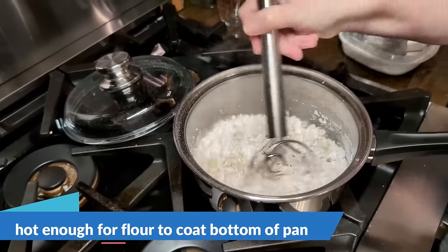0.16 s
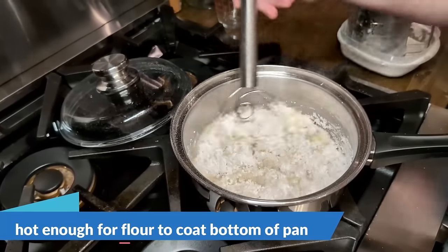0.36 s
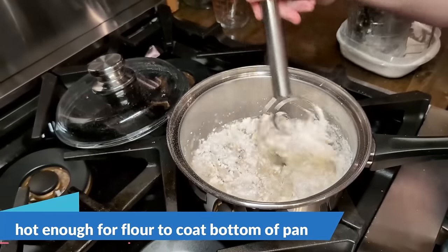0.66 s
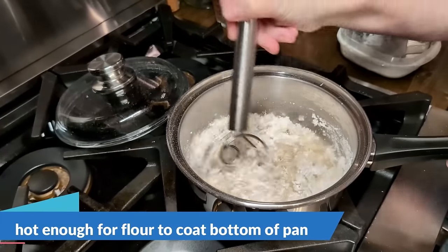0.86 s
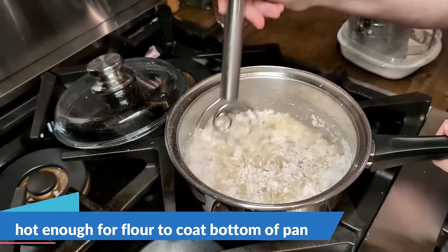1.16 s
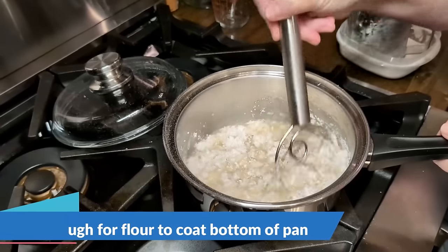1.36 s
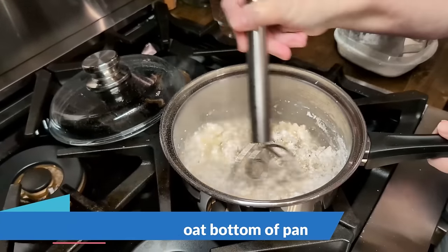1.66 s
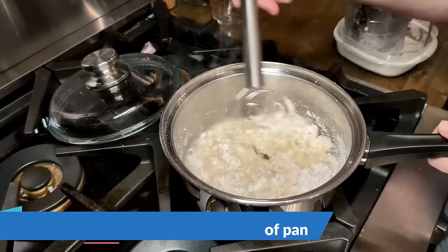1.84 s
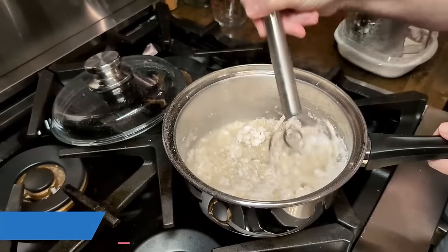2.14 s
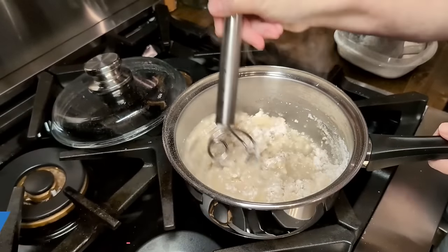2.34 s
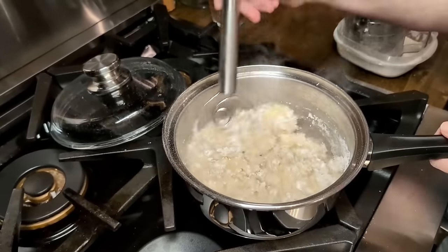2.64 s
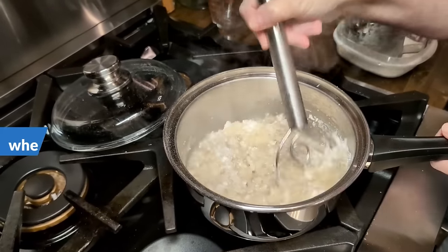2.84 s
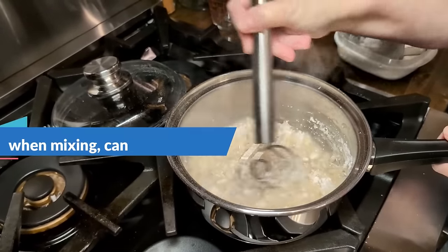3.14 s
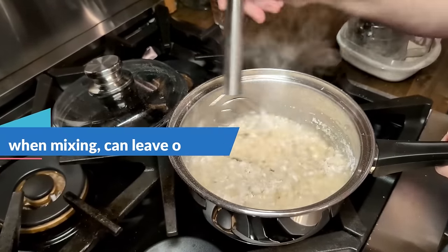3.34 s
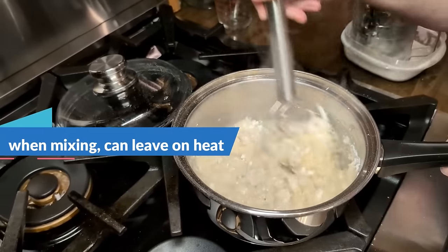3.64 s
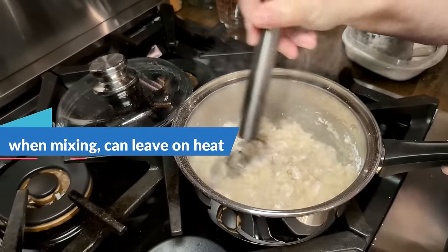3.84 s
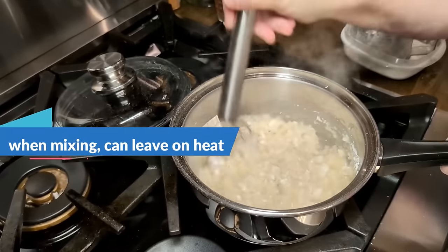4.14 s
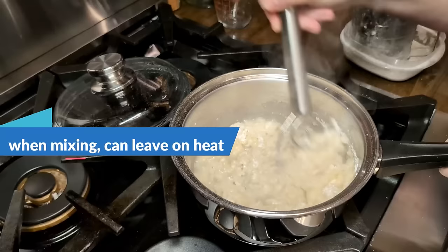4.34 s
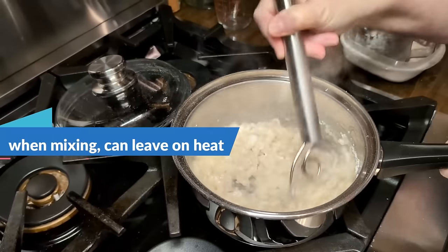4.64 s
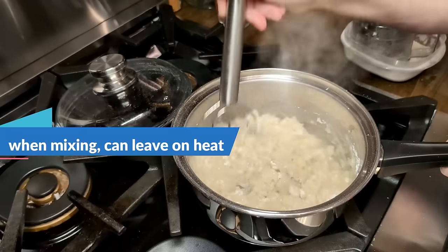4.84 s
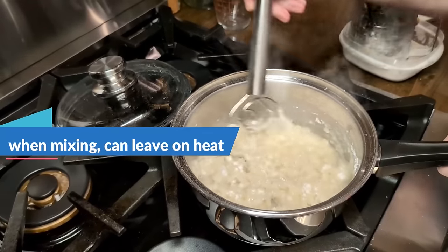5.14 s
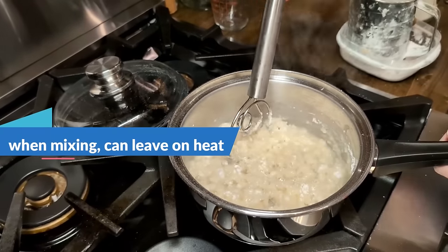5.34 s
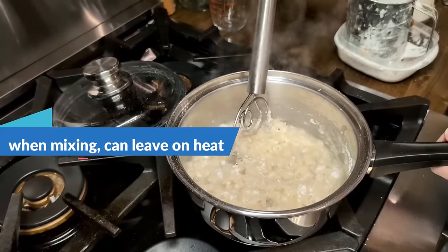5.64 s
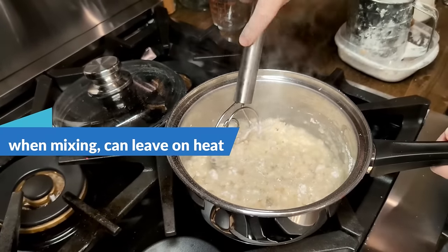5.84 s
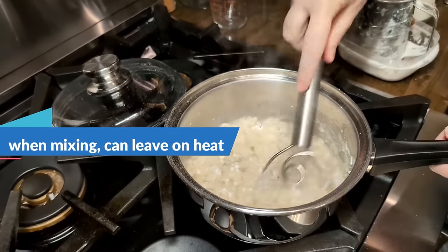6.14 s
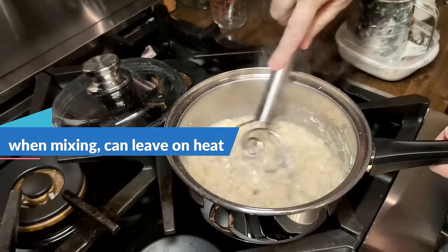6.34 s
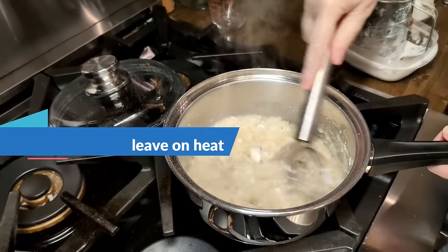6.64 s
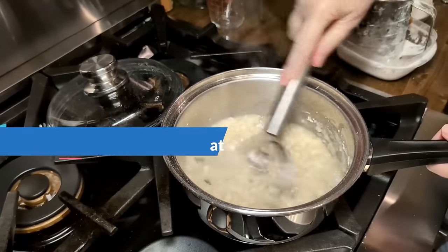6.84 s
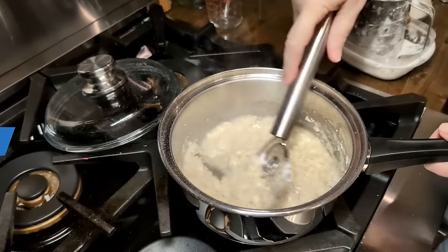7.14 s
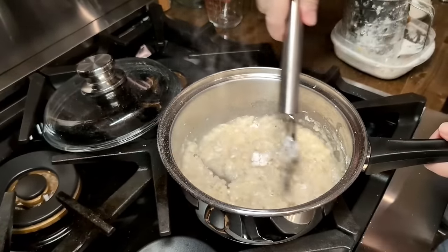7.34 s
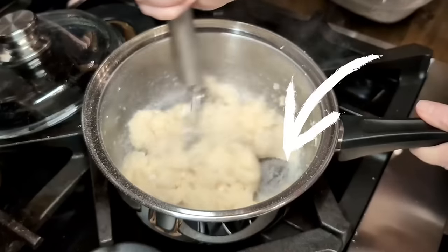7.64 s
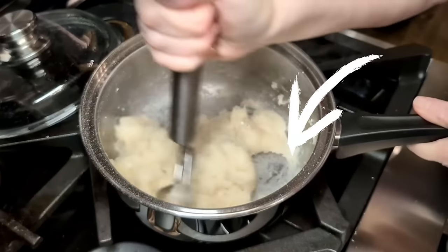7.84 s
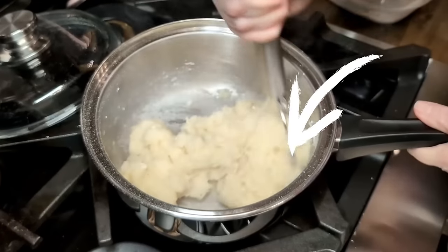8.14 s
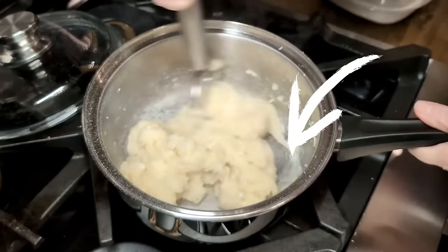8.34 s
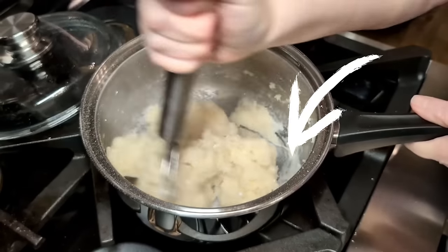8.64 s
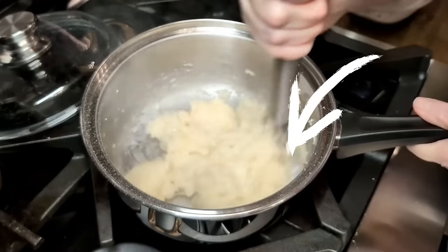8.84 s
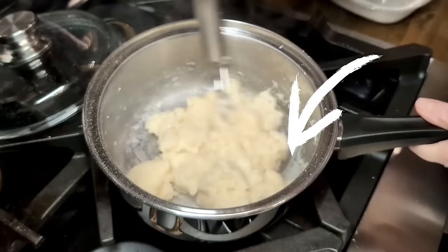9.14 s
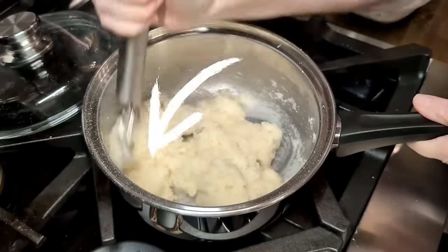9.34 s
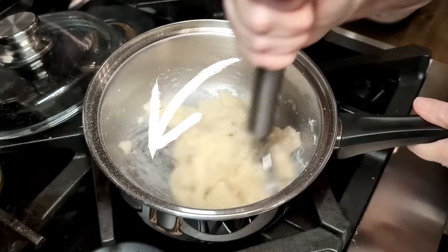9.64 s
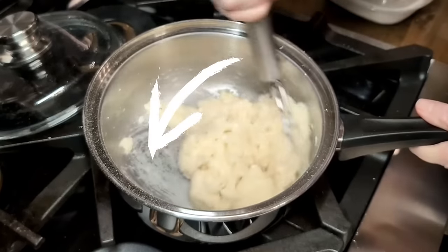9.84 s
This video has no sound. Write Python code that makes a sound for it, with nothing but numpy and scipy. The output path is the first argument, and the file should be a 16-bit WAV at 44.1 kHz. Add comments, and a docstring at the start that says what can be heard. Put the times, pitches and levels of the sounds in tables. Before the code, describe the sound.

A wire whisk circles quickly through thick paste in a steel saucepan, rasping and squelching, then knocks the pan four times and drags through stiff dough.

```python
"""Whisking thick paste in a saucepan

Kitchen stove, one microphone channel, the pan's direct sound standing above its room echo.
A wire whisk circles through flour paste in a steel saucepan: filtered friction noise rasps on the bottom,
noise bursts squelch and hollow notes open in the paste. Four knocks of bouncing wires ring the pan's modes.
Last come slow drags through stiff dough, ringing the pan bottom under a hiss, over low kitchen noise."""
import sys
import numpy as np
from scipy import signal
from scipy.fft import irfft
from scipy.io import wavfile
from scipy.ndimage import uniform_filter1d

SR = 44100
rng = np.random.default_rng(int(sys.argv[2]) if len(sys.argv) > 2 else 0)


def unload_audio(sound):
    """Save the sound as a 16-bit wav file, at the path given as the first command line argument."""
    columns = np.transpose(np.atleast_2d(sound))
    # keep every value between -1 and 1, then stretch to whole-number steps
    steps = np.round(np.clip(columns, -1, 1) * 32767)
    wavfile.write(sys.argv[1], SR, steps.astype(np.int16))


N = 440118
TIME, BINS = np.arange(N) / SR, np.fft.rfftfreq(8192, 1 / SR)  # samples [s], filter bins [Hz]
FRAMES, BANDS = np.arange(N // 128 + 2) * 128 / SR, np.fft.rfftfreq(512, 1 / SR)  # control frames [s], bands [Hz]

# All table levels are relative: each source sets its own trim.
# Rasp resonances at the two ends of the whisk's round, before they glide:
# (centre [Hz], width [Hz], level [dB])
HIGH_RASP = [(1450, 130, -11), (1797, 58, -12), (2630, 600, -19), (3470, 225, 1), (5160, 890, -20.5),
             (5660, 340, -8), (6940, 3400, -15), (8700, 230, -21), (9540, 1300, -19.5),
             (12260, 2600, -25.5)]
LOW_RASP = [(1315, 260, -20.5), (2552, 190, 0.5), (2830, 167, 1.5), (3500, 110, -6), (4870, 750, -7.5),
            (5490, 690, -14), (7140, 1170, -7.5), (8100, 320, -13.5), (10220, 2600, -21.5),
            (12630, 2600, -28)]
# Path of the whisk, circling and then only shifting about: (time [s], position [turns])
WHISK_TURNS = [(0, -0.12), (0.28, 0.45), (1.98, 5), (4.87, 13), (5.08, 13.5), (5.2, 13.74), (5.28, 13.65),
               (6.15, 13.87), (7.7, 14)]
# Wires bearing down on the pan: (peak time [s], level [dB], rise [s], fall [s], treble share [dB])
SCRAPES = [ (0.048, -46.5, 0.02, 0.038, -10.5), (0.15, -57, 0.051, 0.077, -16),
           (0.225, -58.5, 0.029, 0.084, -5), (0.42, -49, 0.031, 0.04, -9), (0.65, -56, 0.086, 0.095, -5.5),
           (0.875, -50.5, 0.075, 0.037, -11.5), (1.07, -59, 0.052, 0.019, -8),
           (1.415, -47.5, 0.051, .04, -8.5), (1.587, -56.5, 0.015, 0.021, -9),
           (1.745, -50.5, 0.031, 0.05, -3.5), (1.808, -49.5, 0.0097, 0.025, -8.5),
           (1.995, -41, 0.03, 0.018, -11), (2.085, -55.5, 0.023, 0.023, -10),
           (2.172, -48, 0.039, 0.022, -3.5), (2.27, -55.5, 0.046, 0.036, -5),
           (2.322, -49.5, 0.0073, .05, -7), (2.415, -52.5, .018, 0.05, -7.5), (2.474, -58, .012, 0.025, 2),
           (2.554, -53.5, 0.025, 0.041, -4.5), (2.68, -49, 0.032, 0.038, -7),
           (2.85, -55.5, 0.023, 0.034, 0), (2.924, -48, 0.045, 0.02, -4.5), (3.08, -54, 0.13, 0.02, -11),
           (3.186, -49, 0.0054, 0.015, -21), (3.295, -50, 0.0068, 0.021, -13),
           (3.394, -47.5, 0.015, 0.023, -10.5), (3.453, -37.5, 0.02, 0.027, -7.5),
           (3.57, -53, 0.048, 0.035, -7), (3.648, -42.5, 0.033, 0.02, -4), (3.77, -56, 0.023, 0.06, -12),
           (3.835, -47, 0.019, 0.014, -6), (3.98, -55.5, 0.036, 0.033, -6.5),
           (4.038, -45, 0.0059, 0.03, -6), (4.16, -51.5, .025, .025, -10), (4.222, -48.5, 0.032, .028, -6),
           (4.289, -49.5, .014, 0.02, 0), (4.355, -40.5, 0.021, 0.023, -5.5), (4.445, -51, 0.012, .02, -9),
           (4.53, -53.5, 0.026, 0.047, -13), (4.744, -41.5, .045, 0.012, -4),
           (4.808, -50.5, 0.016, 0.018, -3.5), (4.909, -43.5, 0.038, 0.013, -8.5),
           (5.02, -55.5, 0.039, 0.045, -0.5), (5.087, -41, 0.033, 0.009, -3.5),
           (5.165, -45.5, 0.0065, .025, -5.5), (5.209, -40, 0.019, .025, -5.5),
           (5.265, -44, 0.023, 0.019, -9), (6.185, -47.5, 0.025, 0.05, -9.5),
           (6.27, -49.5, 0.071, 0.028, -8), (7.72, -61.5, 0.08, 0.054, -7),
           (7.809, -38.5, 0.042, 0.035, -5.5)]
# Wires lifting off the bottom: (time [s])
LIFTS = [0.33, 1.28, 1.555, 1.925, 3.255, 4.015]
# Slow strokes through stiff dough:
# (peak time [s], pressure on the pan [dB], hiss of the wires [dB], rise [s], fall [s])
DRAGS = [ (7.432, -63, -57.5, 0.009, 0.039), (7.985, -40.5, -45, 0.011, 0.044),
         (8.025, -31.5, -38, 0.027, 0.031), (8.165, -67, -52.5, 0.13, 0.027),
         (8.321, -70.5, -76, 0.084, 0.047), (8.45, -67, -67, 0.079, 0.065),
         (8.556, -75.5, -53.5, 0.048, 0.024), (8.687, -45.5, -51.5, 0.017, 0.018),
         (8.722, -36, -43.5, 0.023, 0.031), (8.87, -59, -52, 0.052, .022), (8.97, -69, -51, 0.053, 0.1),
         (9.1, -45.5, -40.5, 0.048, 0.023), (9.21, -50, -75, 0.051, 0.12), (9.28, -54.5, -49, 0.047, 0.12),
         (9.43, -77, -45, 0.045, 0.13), (9.551, -34, -40.5, 0.04, 0.044), (9.875, -56, -56.5, 0.052, 0.032)]
# Pan bottom under the wires: (centre [Hz], width [Hz], level [dB])
PAN_BOTTOM = [(451, 47, -26), (936, 180, -18), (1433, 110, -12), (1938, 86, 0.5), (2300, 130, -11),
              (2520, 230, -12), (2730, 55, 1.5), (2830, 230, -9), (3072, 76, -9), (3512, 2100, -20)]
# Hiss of the dragged wires: (frequency [Hz], level [dB])
WIRE_HISS = [(1500, -20), (3300, -10), (4400, -9.5), (5300, -4.5), (6200, 1), (7000, -2.5), (7600, -8),
             (8400, 1.5), (9800, -5.5), (10900, -7.5), (12000, -10.5), (15500, -19.5)]
# Dough smeared up the wall, sinking in pitch: (time [s], level [dB], centre [Hz])
SMEAR = [(9.183, -57, 2500), (9.2, -43, 2380), (9.24, -49.5, 2020), (9.285, -56.5, 1620), (9.36, -76, 1520)]
# Dough rubbed along the bottom: (time [s], level [dB])
RUB = [(9.6, -86), (9.69, -58.5), (9.75, -53.5), (9.83, -63), (9.93, -69)]
# Resonances of that rub: (centre [Hz], width [Hz], level [dB])
RUB_RESONANCES = [(430, 150, -0.5), (670, 130, -2), (1075, 300, -18.5)]
# Whisk knocked on the pan: (time [s], clatter [dB], clang [dB], chatter [s], ring [dB])
KNOCKS = [(6.7777, -26.5, -22, 0.012, -29.5), (6.893, -28, -41.5, 0.0013, -38),
          (7.001, -15.5, -14.5, 0.0043, -24.5), (7.1317, -24, -58, 0.0045, -55)]
# Dense, quickly dying clatter of wires and pan: (frequency [Hz], level [dB])
CLATTER = [(80, -26), (180, -8), (300, -9), (420, -2.5), (520, 0), (750, 2), (1250, 2), (1650, -3.5),
           (2500, 7.5), (3500, -5.5), (4050, -1), (5400, -4.5), (8500, -6.5), (10500, -13.5),
           (15500, -25.5)]
# Clang of the pan wall: (centre [Hz], width [Hz], level [dB])
WALL_CLANG = [(2280, 25, -10), (2479, 56, 1), (2750, 210, -1), (2870, 17, -7), (3014, 180, 2.5),
              (3320, 60, -8), (3630, 640, -9), (3760, 67, -18)]
# Lasting pan modes: (frequency [Hz], level [dB], t60 [s])
PAN_MODES = [(461, -14, .26), (622, -12, .3), (764, -16, .3), (975, -13, .2), (1252, -10, .2),
             (1822, -9, .18), (2207, -1, .2), (2441, 0, .36), (2459, -6, .45), (2812, 1, .18),
             (3015, -2, .18), (3709, -20, .45), (3840, -5, .14), (4430, -16, .18), (7545, -19, .18),
             (8530, -18, .16)]
# Wires ticking lightly on the pan: (time [s], level [dB], treble share [dB], chatter [s])
TICKS = [(0.033, -61, 0, 0.011), (1.384, -57, -2, 0.0038), (1.572, -56.5, -16, 0.0081),
         (1.793, -52, 0, 0.0065), (1.947, -53.5, -8, 0.0097), (2.46, -52.5, -1.5, 0.011),
         (2.728, -52.5, -1, 0.0079), (3.18, -50.5, -14, 0.0016), (3.381, -70, -15, 0.0082),
         (3.484, -42, -10, 0.02), (4.227, -46.5, -25, 0.0064), (6.071, -50.5, -6.5, 0.026),
         (6.473, -57.5, -1.5, 0.0077), (6.676, -52.5, -5, 0.017)]
# Wires skidding lightly over bare steel: (peak time [s], level [dB], half length [s])
SKIDS = [(5.555, -76, .018), (5.675, -77, .004), (5.79, -79, .018), (5.87, -79, .025), (5.97, -78, .008),
         (6.005, -78, .007), (6.478, -55, .007), (6.733, -47.5, .009), (6.967, -39, .016),
         (7.203, -42, .022)]
# Resonances of those skids: (centre [Hz], width [Hz], level [dB])
BARE_STEEL = [(2630, 750, 0), (4530, 570, 0.5), (5600, 330, -0.5), (7000, 590, -3.5), (8400, 330, -4.5),
              (11500, 7300, -17.5)]
# Paste giving way: (time [s], level [dB], length [s])
SQUELCHES = [(0.484, -57.5, 0.091), (0.843, -51.5, 0.037), (1.581, -51.5, 0.061), (1.791, -55.5, 0.043),
             (2.355, -49, 0.046), (2.728, -51, 0.035), (3.019, -51, 0.057), (3.087, -46.5, 0.063),
             (3.484, -35.5, 0.027), (3.629, -53, 0.055), (3.844, -44, 0.034), (4.135, -51, 0.057),
             (4.226, -41, 0.061), (4.38, -57.5, 0.3), (4.744, -50.5, 0.12), (4.851, -52.5, 0.088),
             (4.916, -47.5, 0.065), (5.147, -41, 0.095), (5.192, -38.5, 0.029), (6.216, -54, 0.11),
             (7.995, -56, 0.27), (8.719, -60, 0.45)]
# Spectrum of the squelches: (frequency [Hz], level [dB])
PASTE_SPECTRUM = [(60, -17.5), (200, -10), (300, -4.5), (420, -1.5), (680, 0.5), (1000, -9), (1400, -14.5),
                  (2200, -8.5), (5000, -29)]
# Air pockets opening in the paste: (time [s], level [dB], centre [Hz])
AIR_POCKETS = [(1.511, -52, 1350), (3.354, -52, 1290), (3.7, -47, 1300), (4.0728, -44, 1284),
               (4.412, -42.5, 1300), (4.7696, -39, 1315), (5.1549, -31, 1390), (7.342, -46, 820)]
# Spectrum of the kitchen background: (frequency [Hz], level per Hz [dB])
KITCHEN_NOISE = [(26, -41.5), (45, -3), (184, -10), (285, -6), (322, -13), (524, -12), (852, -20.5),
                 (939, -23.5), (1090, -26), (2200, -31), (2370, -22.5), (3240, -33.5), (15000, -47.5)]
# Decay of the room: (frequency [Hz], t60 [s])
ROOM_DECAY = [(150, 0.84), (700, 0.55), (2500, 0.33), (6000, 0.3), (14000, 0.14)]

# The main rasp resonance is highest at each whole turn; its dip half way round deepens as the paste thickens
TOP_HZ, DIP_HZ, DIP_HZ_PER_S, DEEPEST_DIP_HZ = 3482, 330, 340, 870
# Light rubbing while the whisk circles, a little louder and duller at the top of each turn
RUBBING_DB, RUBBING_SWING_DB = -64.5, 2
RUBBING_TREBLE_DB, TREBLE_SWING_DB = -6.5, 3
CIRCLING_END_S, CIRCLING_FADE_S, LIFT_S = 5.1, 0.015, 0.021
# Exponents of a stroke's (rise, fall): 1 a sharp peak, 2 a round bell
SCRAPE_SHAPE, DRAG_SHAPE = (1.4, 1.8), (1.5, 1.06)
BACKGROUND_DB, EDGE_HZ = -69, 15900


def stirring():
    """Friction whose resonances glide and hand over from one set to the other as the whisk goes round."""
    level_db, hz, treble_db = whisk_motion()
    place = np.clip((hz - 2780) / 600, 0, 1)
    high = shifted(HIGH_RASP, (hz / 3470) ** 0.26)
    low = shifted(LOW_RASP, (hz / 2660) ** 0.4)
    gain = np.hypot(place * high, (1 - place) * low)
    gain = np.hypot(gain, amp(-17.5) * shifted(PAN_BOTTOM, 0.94))  # the pan bottom answers faintly
    # tilt the colour towards the treble share of the moment
    treble_power = (gain[BANDS > 6500] ** 2).sum(0)
    share_db = 10 * np.log10(treble_power / (gain ** 2).sum(0))
    tilt = read([(3200, 0.13), (5500, 1.3), (7500, 2.3), (12000, 3.23)], BANDS)[:, None]
    gain = gain * amp(tilt * np.clip(treble_db - share_db - 0.7, -9, 9))
    return amp(level_db - 2.0) * rasp(gain, patch_db=4.5, grain_db=1.0, judder_db=2.5)


def whisk_motion():
    """Level, main resonance and treble share of the rasp: rubbing that follows the turn, plus scrapes."""
    top = np.cos(2 * np.pi * np.interp(FRAMES, *np.transpose(WHISK_TURNS)))  # 1 at each whole turn
    dip = np.minimum(DIP_HZ + DIP_HZ_PER_S * FRAMES, DEEPEST_DIP_HZ)
    hz = TOP_HZ - dip * (1 - top) / 2
    contact = (1 - np.tanh((FRAMES - CIRCLING_END_S) / CIRCLING_FADE_S)) / 2
    for s in LIFTS:
        contact = contact * (1 - np.exp(-((FRAMES - s) / LIFT_S) ** 2))
    power = (contact * amp(RUBBING_DB + RUBBING_SWING_DB * top)) ** 2 + 1e-12
    treble = power * amp(RUBBING_TREBLE_DB - TREBLE_SWING_DB * top) ** 2
    for s, db, rise, fall, treble_db in SCRAPES:
        scrape = (amp(db) * stroke(s, rise, fall, SCRAPE_SHAPE)) ** 2
        power = power + scrape
        treble = treble + scrape * amp(treble_db) ** 2
    level_db = np.interp(TIME, FRAMES, 10 * np.log10(power))
    return level_db, hz, 10 * np.log10(treble / power)


def dragging():
    """Wires pressed through stiff dough make the bared pan bottom sing under their hiss."""
    press_db, hiss_db = drag_levels()
    smear_db, smear_hz = gesture(SMEAR)
    rub_db, = gesture(RUB)
    grit = rasp(steady(np.ones(len(BANDS))), patch_db=5.5, grain_db=1.5, judder_db=-3.3)
    bottom = amp(press_db + 1.5) * colour(grit, humps(PAN_BOTTOM))
    hiss_gain = steady(amp(read(WIRE_HISS, BANDS)))
    hiss = amp(hiss_db - 2.0) * rasp(hiss_gain, patch_db=3.0, grain_db=-3.0, judder_db=2.5)
    sinking = shifted([(2000, 420, 0)], np.interp(FRAMES, TIME, smear_hz) / 2000)
    smear = amp(smear_db) * rasp(sinking, patch_db=3.5, grain_db=1.5, judder_db=1.2)
    rub = amp(rub_db) * colour(rng.standard_normal(N), humps(RUB_RESONANCES))
    return bottom + hiss + smear + rub


def drag_levels():
    """Each slow stroke presses on the pan and makes the wires hiss, in its own proportion: levels in dB."""
    press = hiss = 1e-12
    for s, press_db, hiss_db, rise, fall in DRAGS:
        swell = stroke(s, rise, fall, DRAG_SHAPE)
        press = press + (amp(press_db) * swell) ** 2
        hiss = hiss + (amp(hiss_db) * swell) ** 2
    return [np.interp(TIME, FRAMES, 10 * np.log10(power)) for power in (press, hiss)]


def knocks():
    """Hard blows: a wide clatter, the clang of the wall, and a few modes that ring on."""
    t, out = np.arange(SR) / SR, np.zeros(N)
    for s, clatter_db, clang_db, chatter, ring_db in KNOCKS:
        add(out, s, amp(clatter_db) * strike(chatter, t60=0.07, gain=amp(read(CLATTER, BINS))))
        add(out, s, amp(clang_db) * strike(chatter, t60=0.014, gain=humps(WALL_CLANG)))
        for hz, db, t60 in PAN_MODES:
            # whisk and dough keep touching the pan, which makes each mode's ring uneven
            unevenness = .75 * wander(hz=55.6, count=len(t))
            tone = np.sin(2 * np.pi * (hz * t + rng.random()) + unevenness)
            onset = 1 - np.exp(-t / .001)
            add(out, s, amp(ring_db + db - 60 * t / t60) * tone * onset)
    return out


def ticks():
    """Light touches sound wires, bottom and wall together; skids are friction through steel resonances."""
    out = np.zeros(N)
    wires = humps(HIGH_RASP) + amp(-6) * humps(LOW_RASP)
    body = wires + amp(-1.0) * humps(PAN_BOTTOM) + amp(-4.0) * humps(WALL_CLANG)
    for s, db, treble_db, chatter in TICKS:
        touch = strike(chatter, t60=0.048, gain=body)
        add(out, s, amp(db) * retreble(touch, treble_db, split_hz=2800))
    sliding = sum(amp(db) * np.exp(-((TIME - s) / length) ** 2) for s, db, length in SKIDS)
    friction = slips(grain_db=-3.0, judder_db=3.5, judder_hz=154.3)
    return out + sliding * colour(friction, humps(BARE_STEEL))


def paste():
    """Dull, grainy noise squelches, and short hollow notes of narrow noise where air pockets open."""
    t, drive, pockets = np.arange(SR // 3) / SR, np.zeros(N), np.zeros(N)
    for s, db, length in SQUELCHES:
        swell = (1 - np.exp(-t / 0.002)) * np.exp(-(t / length) ** 1.58)
        grains = slips(grain_db=2.5, judder_db=5.5, judder_hz=143.4, count=len(t))
        add(drive, s, amp(db - 9) * swell * grains)
    for s, db, hz in AIR_POCKETS:
        note = unit(colour(rng.standard_normal(len(t)), humps([(hz, 150, 0), (hz, 500, -12)])))
        opening = np.exp(-((t - .014) / 0.014) ** 2)
        add(pockets, s, amp(db - 13.0) * note * opening)
    return colour(drive, amp(read(PASTE_SPECTRUM, BINS))) + pockets


def background():
    """Low, steady noise of the kitchen, shaped by its spectrum and high-passed at 50 Hz."""
    noise = colour(rng.standard_normal(N), amp(read(KITCHEN_NOISE, BINS)))
    high_pass = signal.butter(3, 50, "high", fs=SR, output="sos")
    return amp(BACKGROUND_DB) * unit(signal.sosfilt(high_pass, noise))


def kitchen(x, near_db, room_db):
    """Quick sparse reflections off the stove and wall, then a short diffuse tail."""
    t = np.arange(SR // 2) / SR
    arrivals = rng.standard_normal(len(t)) * (rng.random(len(t)) < 900 / SR)  # about 900 per second
    near = arrivals * (t > .002) * np.exp(-t / 0.0087)
    hz, at, z = signal.stft(rng.standard_normal(len(t)) * (t > .012), SR, nperseg=256)
    decay = amp(-60 * at / read(ROOM_DECAY, hz)[:, None])
    tail = signal.istft(z * decay, SR, nperseg=256)[1][:len(t)]
    echo = amp(near_db) * near / np.linalg.norm(near) + amp(room_db) * tail / np.linalg.norm(tail)
    return x + signal.oaconvolve(x, echo)[:N]


def rasp(gain, patch_db, grain_db, judder_db):
    """Friction under a moving colour; wires touch and leave singly, so patches of spectrum flare and fade."""
    patches = uniform_filter1d(rng.standard_normal(gain.shape), size=13, axis=1)  # over time
    patches = uniform_filter1d(patches, size=5, axis=0)  # over frequency
    gain = gain * amp(patch_db * unit(patches))
    z = signal.stft(slips(grain_db, judder_db, judder_hz=150), nperseg=512, noverlap=384)[2]
    z = z[:, :len(FRAMES)] * gain / np.sqrt(np.mean(gain ** 2, axis=0))
    return signal.istft(z, nperseg=512, noverlap=384)[1][:N]


def slips(grain_db, judder_db, judder_hz, count=N):
    """Friction: countless tiny slips of uneven size, bunched as the wires catch and let go."""
    sizes = amp(grain_db * np.minimum(rng.exponential(1, count), 5))
    sizes = sizes * (rng.random(count) < .25)  # a quarter of the samples slip
    bunching = amp(judder_db * wander(judder_hz, count))
    return unit(rng.standard_normal(count) * sizes * bunching)


def strike(chatter, t60, gain):
    """Wires bounce on the metal for a moment, then their shaking dies; the blow sets the energy."""
    t = np.arange(SR // 3) / SR
    shaking = (1 - np.exp(-t / 0.00033)) * amp(-60 * np.maximum(t - chatter, 0) / t60)
    sound = colour(rng.standard_normal(len(t)) * shaking, gain)
    return sound * np.linalg.norm(shaking) / np.linalg.norm(sound)


def stroke(s, rise, fall, shapes):
    """Gain of one stroke, frame by frame: it swells to its peak at s and lets go."""
    rising = FRAMES < s
    span = np.maximum(np.where(rising, rise, fall), 1e-3)
    return np.exp(-(abs(FRAMES - s) / span) ** np.where(rising, *shapes))


def gesture(rows):
    """Control curves through the rows; the first, a level in dB, is -120 before and after."""
    s, db, *others = np.transpose(rows)
    level = np.interp(TIME, s, db, left=-120, right=-120)
    return [level] + [np.interp(TIME, s, c) for c in others]


def wander(hz, count):
    """Random curve: straight lines between normal random values, hz of them per second."""
    knots = rng.standard_normal(4000)
    return np.interp(np.arange(count) / SR * hz, np.arange(len(knots)), knots)


def humps(rows):
    """Gain over frequency of a set of steep-sided resonances."""
    power = 0
    for hz, width, db in rows:
        offset = (BINS - hz) / width * np.sqrt(2)
        power = power + amp(db) ** 2 / (1 + offset ** 2) ** 3
    return np.sqrt(power)


def shifted(rows, factor):
    """Resonances whose frequencies all move by a factor: gain over bands x frames."""
    return np.interp(BANDS[:, None] / factor, BINS, humps(rows))


def steady(gain):
    """The same gain over bands in every frame."""
    return gain[:, None] * np.ones(len(FRAMES))


def colour(x, gain):
    """Causal minimum-phase filter with the given gain over frequency; keeps the power of white noise."""
    log_gain = np.log(np.r_[gain, gain[-2:0:-1]] + 1e-5)
    phase = -signal.hilbert(log_gain).imag[:len(gain)]
    taps = irfft(gain * np.exp(1j * phase))[:len(gain)]
    return signal.oaconvolve(x, taps / np.linalg.norm(taps))[:len(x)]


def retreble(x, share_db, split_hz):
    """Sets the share of the sound that lies above the split, up to 0.95 in amplitude."""
    top = signal.sosfiltfilt(signal.butter(3, split_hz, "high", fs=SR, output="sos"), x)
    share = np.minimum(amp(share_db), .95)
    return np.std(x) * (share * unit(top) + np.sqrt(1 - share ** 2) * unit(x - top))


def read(points, hz):
    """Curve through (frequency, value) points, straight over log frequency."""
    f, value = np.transpose(points)
    return np.interp(np.log(hz + 1), np.log(f + 1), value)


def amp(db):
    """Decibels to amplitude."""
    return 10 ** (np.asarray(db) / 20)


def unit(x):
    """Scales to an RMS of one."""
    return x / np.sqrt(np.mean(x ** 2) + 1e-20)


def add(mix, s, sound):
    """Adds a sound into the mix from time s, in place."""
    part = mix[max(round(s * SR), 0):][:len(sound)]
    part += sound[:len(part)]


def scene():
    """Whisk, paste and pan in the kitchen; the knocks have weaker near reflections and more room tail."""
    rubbing = kitchen(stirring() + dragging() + paste() + ticks(), near_db=-6.5, room_db=-18.5)
    knocking = kitchen(knocks(), near_db=-20.5, room_db=-15.5)
    return (rubbing + knocking + background())[None]


def record(dry):
    """The recorder's band limit: a linear-phase low-pass."""
    low_pass = signal.firwin(301, EDGE_HZ, window=("kaiser", 9), fs=SR)
    return signal.oaconvolve(dry, low_pass[None], "same")


dry = scene()
out = record(dry)
unload_audio(out)
```